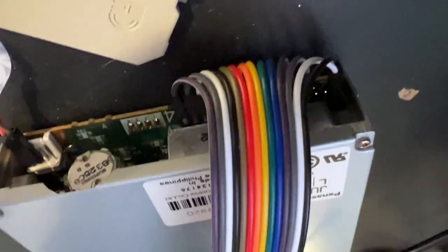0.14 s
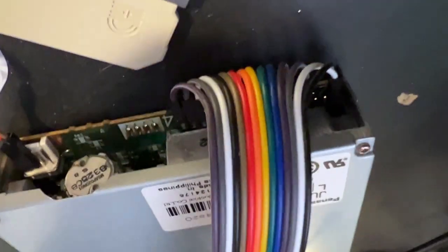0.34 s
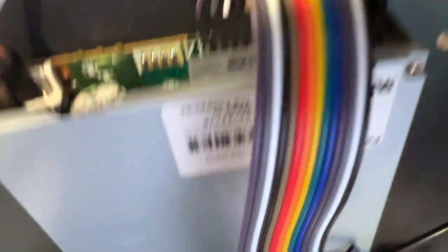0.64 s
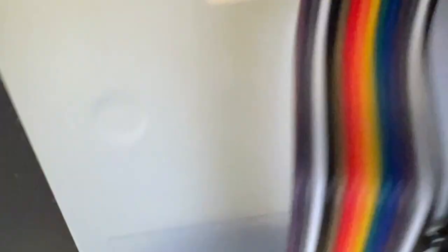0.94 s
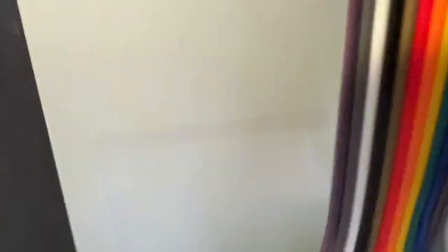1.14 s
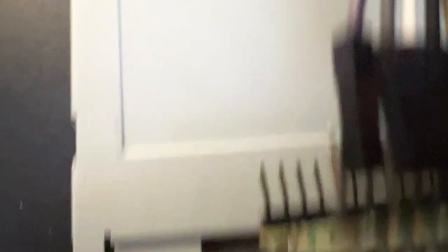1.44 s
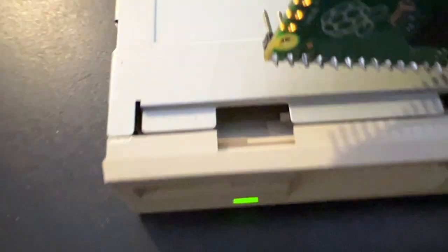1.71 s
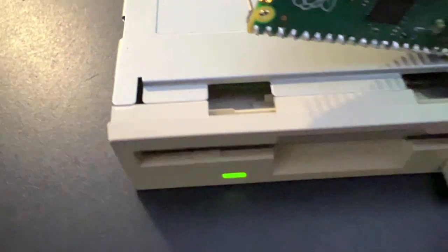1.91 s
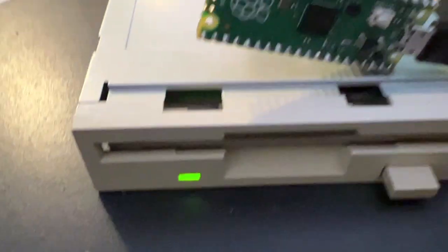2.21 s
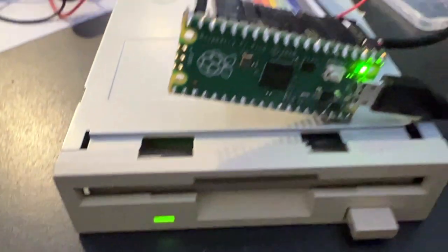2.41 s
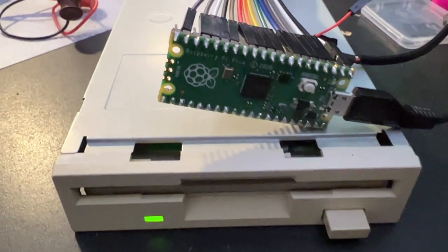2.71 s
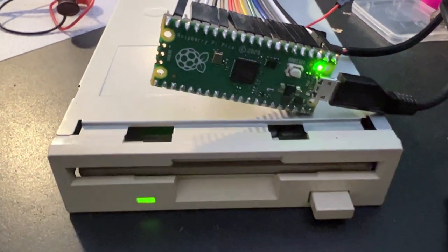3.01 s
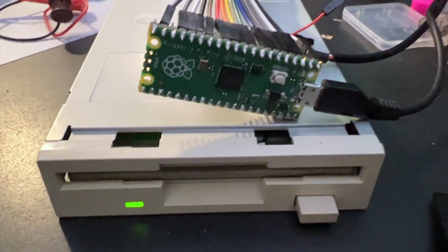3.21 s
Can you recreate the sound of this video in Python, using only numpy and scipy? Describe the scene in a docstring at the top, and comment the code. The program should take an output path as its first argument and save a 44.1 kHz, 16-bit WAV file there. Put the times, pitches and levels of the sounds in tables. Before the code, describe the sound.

Floppy disk drive spins with faint whine and rhythmic squeaks, two sharp head knocks, dry handling ticks

```python
"""Room rumble and hiss come first, with a motor whine and a squeak once per disk turn: a floppy disk drive on a desk.
A hand-held two-port microphone swings from its back to its front; the head knocks twice; dry ticks run at the left port.
Squeaks are gliding sines; knocks ring body modes; whine, hum and narrow hiss are resonated noise.
Ticks and scrape are band-passed noise bursts and grains; hand bumps are struck resonances; the room is shaped noise."""
import sys
import numpy as np
from scipy import signal
from scipy.fft import rfft, irfft
from scipy.io import wavfile

SR = 44100
rng = np.random.default_rng(int(sys.argv[2]) if len(sys.argv) > 2 else 0)


def bounce(signal):
    """Save signal as a 16-bit WAV file at the path given by the first command-line argument."""
    frames = np.transpose(np.atleast_2d(signal))
    limited = np.clip(frames, -1, 1)
    pcm = np.round(limited * 32767).astype(np.int16)
    wavfile.write(sys.argv[1], SR, pcm)


N = 147735


def amp(db):
    """Amplitude factor of a level in dB."""
    return 10 ** (np.asarray(db) / 20)


def unit(x):
    """Scale to rms 1."""
    return x / np.sqrt(np.mean(x ** 2) + 1e-20)


def times():
    """Sample times [s]."""
    return np.arange(N) / SR


def curve(rows):
    """Interpolate (time, level) rows over the scene."""
    return np.interp(times(), *np.transpose(rows))


def at_hz(points, hz, column=1):
    """Interpolate a table column over log frequency."""
    p = np.array(points)
    log_hz = np.log(np.maximum(hz, 1))
    return np.interp(log_hz, np.log(np.maximum(p[:, 0], 1)), p[:, column])


def drift(rate_hz):
    """Slow random signal of rms 1: two-pole low-passed noise, computed at SR / 40."""
    step = 40
    r = np.exp(-2 * np.pi * rate_hz * step / SR)
    settle = 2000
    noise = rng.standard_normal(N // step + settle + 2)
    slow = signal.lfilter([1], [1, -2 * r, r * r], noise)[settle:]
    return np.interp(np.arange(N) / step, np.arange(len(slow)), unit(slow))


def ring(x, hz, t60_s):
    """Two-pole resonator: a unit click starts a decaying sine of height 1."""
    r = amp(-60 / (max(t60_s, .001) * SR))
    w = 2 * np.pi * hz / SR
    return signal.lfilter([0, np.sin(w)], [1, -2 * r * np.cos(w), r * r], x + 1e-18)


def band(x, edges_hz):
    """Butterworth band-pass."""
    edges_hz = np.clip(edges_hz, 10, 19000)
    return signal.sosfilt(signal.butter(2, edges_hz, "band", fs=SR, output="sos"), x)


def coloured(spectrum, shape, column=1):
    """Noise with the spectral shape of a table column, rms 1."""
    gain = amp(at_hz(spectrum, np.fft.rfftfreq(N, 1 / SR), column=column))
    return unit(irfft(rfft(rng.standard_normal(shape)) * gain, N))


def narrow(hz, wide_hz):
    """Noise through a narrow resonance: a wavering tone, rms 1."""
    return unit(ring(rng.standard_normal(N), hz, np.log(1000) / (np.pi * wide_hz)))


def fade(peak_s, rise_s, t60_s):
    """Swell of 20 dB per rise_s up to peak_s, then exponential decay."""
    t = times() - peak_s
    decay = np.where(t < 0, -t / rise_s / 3, t / t60_s)
    return amp(-60 * np.clip(decay, 0, 5))


# one squeak of the disk in its sleeve: (time after start [s], centre pitch [Hz], relative level [dB])
SQUEAK_GLIDE = [(0, 9250, -14), (.006, 9200, -5), (.022, 9000, -2.5), (.027, 8800, -3), (.034, 8600, -1.5),
                (.041, 8650, -0.5), (.048, 9000, -3.5), (.056, 9700, -9), (.064, 10300, -24)]
# squeak from turn to turn: (time [s], level [dB], extra lead-in level [dB])
SQUEAK_TURNS = [(0.1101, -52, -12), (0.3097, -56.5, -9), (0.5043, -60, -4), (0.7064, -51, -8),
                (0.9097, -53.5, 0), (1.1094, -73, 0), (1.3014, -42.5, -16), (1.502, -43, -2),
                (1.71, -42.5, -1), (1.9011, -44.5, -1), (2.1066, -45.5, 0), (2.3094, -51.5, 0),
                (2.5094, -57.5, 3), (2.7076, -53.5, -2), (2.91, -54.5, 5), (3.1094, -53.5, -1),
                (3.3129, -53.5, -3)]
FIRST_SQUEAK_S, TURN_S, SQUEAK_LEAD_IN_S = 0.0742, .2, .024
SQUEAK_FLUTTER_DB, SQUEAK_WOBBLE_HZ = 2.5, 92.7   # rms
SQUEAK_BLUR_HZ, SQUEAK_BLUR = 250, .7   # top of the roughness band, rms depth


def squeaks():
    """One gliding sine per disk turn, roughened by noise modulation."""
    glide_s, glide_hz, glide_db = np.transpose(SQUEAK_GLIDE)
    turn_s, turn_db, lead_in_db = np.transpose(SQUEAK_TURNS)
    since_s = (times() - FIRST_SQUEAK_S) % TURN_S
    lead_in = np.clip((SQUEAK_LEAD_IN_S - since_s) / .004, 0, 1)
    level_db = np.interp(since_s, glide_s, glide_db) + np.interp(times(), turn_s, turn_db)
    level_db += lead_in * np.interp(times(), turn_s, lead_in_db)
    level_db += SQUEAK_FLUTTER_DB * drift(84)
    pitch_hz = np.interp(since_s, glide_s, glide_hz) + SQUEAK_WOBBLE_HZ * drift(90)
    whistle = np.sin(2 * np.pi * np.cumsum(pitch_hz) / SR)
    grain = 1 + SQUEAK_BLUR * unit(band(rng.standard_normal(N), (20, SQUEAK_BLUR_HZ)))
    return amp(level_db) * grain * (since_s < glide_s[-1]) * whistle


# head knocks: (time [s], body level [dB])
HEAD_KNOCKS = [(.859, -20.5), (2.656, -19.5)]
# contacts, one list per knock: (time [s], strength into high modes [dB], into low modes [dB])
KNOCK_CONTACTS = [
    [(.8545, -14, -26), (.8593, 2, -10), (.862, -2.5, -14), (.8655, -1.5, 0), (.872, -8, -17),
     (.8775, -15.5, -15), (.885, -22, -18)],
    [(2.6548, 1.5, -4), (2.657, 1, -1.5), (2.661, -5.5, -12), (2.667, -9, -12), (2.672, -17, -18),
     (2.685, -23, -20)],
]
# drive body modes: (frequency [Hz], level from behind [dB], level from the front [dB], t60 [s])
BODY_MODES = [(253, -11, -13, 0.13), (310, -4.5, -8.5, 0.077), (390, -7, -6, .06), (456, -6, 1, 0.1),
              (517, -4, 0, 0.13), (580, -12, -9, 0.14), (759.5, -5.5, -14, 0.1), (1005, 0.5, -4.5, 0.074),
              (1130, -1, -9, 0.13), (1320, -12, -13, 0.068), (1728, -7, -5.5, 0.056),
              (1940, -2.5, -8, 0.057), (2130, -4, -14, 0.055), (2907, -5, -15, 0.04),
              (3990, -4, -24, 0.024), (7840, -13, -22, 0.0297)]
# crack noise, relative: (frequency [Hz], level from behind [dB per Hz], level from the front [dB per Hz])
CRACK_SPECTRUM = [(170, -34, -36), (330, -4, -3), (550, -8, -5), (950, 2, -2.5), (2450, -6, -10.5),
                  (4140, -11, -15.5), (5660, -15.5, -24), (6300, -20, -19), (7600, -9.5, -15),
                  (11100, -20.5, -8), (12600, -26, -23), (14500, -20, -27), (16200, -40, -34)]
LOW_MODES_HZ, KNOCK_PAN_DB = 700, 2
CHATTER_PER_S, CHATTER_DB, CHATTER_T60_S, CHATTER_RISE_S = 1500, -12, .012, 0.0021
CRACK_DB, CRACK_T60_S = -20, 0.02
ROOM_DB, ROOM_T60_S, ROOM_DULL_HZ = -11.5, 0.2, 5000   # ROOM_DB is relative to the crack


def knock_body(contacts, column):
    """Contacts and the chatter around them ring the drive's modes."""
    grit = amp(CHATTER_DB) * (rng.random(N) < CHATTER_PER_S / SR) * rng.standard_normal(N)
    drive = np.zeros((2, N))   # into high modes, into low modes
    for at_s, high_db, low_db in contacts:
        touch = grit * fade(at_s, CHATTER_RISE_S, CHATTER_T60_S)
        touch[int(at_s * SR)] = 1
        drive += amp([[high_db], [low_db]]) * touch
    body = 0
    for j, mode in enumerate(BODY_MODES):
        hz, t60_s = mode[0], mode[3]
        rung = ring(drive[int(hz < LOW_MODES_HZ)], hz, t60_s)
        sign = (-1) ** ((j + 1) // 2)
        body = body + sign * amp(mode[column]) * rung / abs(rung).max()
    return body


def knock_crack(contacts, column):
    """Shaped noise swelling and decaying at each contact, summed in power."""
    power = 0
    for at_s, high_db, _ in contacts:
        power = power + amp(2 * high_db) * fade(at_s, CHATTER_RISE_S, CRACK_T60_S) ** 2
    return amp(CRACK_DB) * power ** .5 * coloured(CRACK_SPECTRUM, N, column=column)


def knock_room(knock_s, column):
    """Decaying noise tail of one knock, two independent channels."""
    swell = fade(knock_s + 0.0057, 0.022, ROOM_T60_S)
    return amp(CRACK_DB + ROOM_DB) * swell * coloured(CRACK_SPECTRUM, (2, N), column=column)


def knocks():
    """Two head knocks, first heard from behind, then from the front: body, crack, dull room tail."""
    near, tail = 0, 0
    for column, ((knock_s, body_db), contacts) in enumerate(zip(HEAD_KNOCKS, KNOCK_CONTACTS), start=1):
        near = near + amp(body_db) * knock_body(contacts, column)
        near = near + knock_crack(contacts, column)
        tail = tail + knock_room(knock_s, column)
    tail = signal.sosfilt(signal.butter(1, ROOM_DULL_HZ, fs=SR, output="sos"), tail)
    tail = amp(2.6 * drift(60)) * tail
    pan = amp([[KNOCK_PAN_DB / 2], [-KNOCK_PAN_DB / 2]])
    return ports(near + tail[0]) * pan + tail[1] * np.array([[.6], [-.6]])


# motor whine: (time [s], level [dB])
WHINE_LEVEL = [(0, -54), (.5, -51.5), (1, -49.5), (1.5, -46), (1.75, -59), (2.3, -52.5), (2.8, -54),
               (3.35, -55.5)]
# low hiss band, heard from behind the drive: (time [s], level [dB])
HISS_LOW_LEVEL = [(0, -61.5), (.4, -62.5), (.8, -74), (1.1, -70), (1.4, -79), (3.35, -95)]
# high hiss band: (time [s], level [dB])
HISS_HIGH_LEVEL = [(0, -66), (.6, -66), (1.2, -64), (1.6, -67), (2.0, -62), (2.5, -62), (2.9, -62),
                   (3.35, -65)]
WHINE_HZ, WHINE_WIDE_HZ, WHINE_FLUTTER_DB = 980, 24, 1.2
HUM_HZ, HUM_WIDE_HZ, HUM_DB = 117.9, 12, -43.5
HISS_LOW_HZ, HISS_LOW_WIDE_HZ = 4300, 700
HISS_HIGH_HZ, HISS_HIGH_WIDE_HZ = 13700, 350


def tones():
    """Motor whine, mains hum and two hiss bands: noise through narrow resonances."""
    whine_db = curve(WHINE_LEVEL) + WHINE_FLUTTER_DB * drift(19)
    whine = amp(whine_db) * narrow(WHINE_HZ, WHINE_WIDE_HZ)
    hum = amp(HUM_DB) * narrow(HUM_HZ, HUM_WIDE_HZ)
    hiss_low = amp(curve(HISS_LOW_LEVEL)) * narrow(HISS_LOW_HZ, HISS_LOW_WIDE_HZ)
    hiss_high = amp(curve(HISS_HIGH_LEVEL)) * narrow(HISS_HIGH_HZ, HISS_HIGH_WIDE_HZ)
    return whine + hum + hiss_low + hiss_high


# phase lead of the left port, negative = lag: (frequency [Hz], lead [rad])
PORT_LEAD = [(100, -.2), (1000, -1.1), (3000, -1.4), (6000, -.8), (8500, -1.3), (9200, -2.4), (9600, -3.14),
             (10900, -3.14), (11700, -5.6), (12300, -6.28), (16000, -6.6)]


def ports(x):
    """Split the phase difference between the ports evenly: half lead left, half lag right."""
    half = np.exp(.5j * at_hz(PORT_LEAD, np.fft.rfftfreq(N, 1 / SR)))
    return irfft(rfft(x) * np.array([half, half.conj()]), N)


# ticks: (time [s], ring peak [dB], left-right [dB], body re ring [dB], low body re ring [dB],
#         air re ring [dB], snap time scale [s])
TICK_EVENTS = [(1.0435, -54, 5, -3, -3, -18, 0.0018), (1.088, -47, 15, -3, -3, -18, 0.0018),
               (1.16, -43, 19, 1, -3, -20, 0.0018), (1.194, -39, 22, -4, -6, -27, 0.0019),
               (1.265, -50, 13, -7, -5, -16, 0.0018), (1.285, -42, 21, -6, -3, -17, 0.0018),
               (1.317, -36, 22, 0, -8, -25, 0.002), (1.3515, -34.5, 25, 0, -2, -26, 0.002),
               (1.374, -36, 21, -3, 2, -23, 0.0019), (1.4, -32, 27, 0.5, -5, -30, 0.002),
               (1.4371, -27, 27, -2, -1, -22, 0.0022), (1.457, -36, 14, -10, -7, -8, 0.0018),
               (1.465, -40, 20, -2, 0, -20, .0015), (1.4762, -21, 26, -6, -3, -14, 0.0026),
               (1.503, -24, 32, 2.5, -2.5, -22, 0.0024), (1.5253, -23.5, 30, 2, 1, -15, 0.0018),
               (1.557, -36, 14, -4, -3, -9, 0.002), (1.5623, -27.5, 25, 4.5, 0, -5.5, 0.0027),
               (1.5744, -43, 5.0, -2, -3, 0, 0.0018), (1.633, -27.5, 32, 2.5, 0, -21, 0.0027),
               (1.638, -32, 30, -1, 0, -21, 0.0015), (1.6602, -26, 30, 7, 3.5, -17, 0.0022),
               (1.672, -40, 25, 0, -5, -17, 0.0017), (1.695, -19, 27, -0.5, 0, -22, 0.0025),
               (1.7676, -18, 33, -1, -2.5, -24, 0.002), (1.8177, -17, 32, -1, -5, -32, 0.0016),
               (1.8705, -17, 32, -1, -5.5, -32, 0.0018), (1.928, -15.5, 32, -6.5, -7.5, -32, 0.0016),
               (2.0216, -17, 32, -1, -2, -13, 0.0015), (2.1064, -13, 36, -8.5, -7.5, -32, 0.0011),
               (2.203, -24, 31, 6, 1, -28, 0.0014), (2.3418, -26.5, 31, 5, 2.5, -28, 0.002)]
# tick resonances: (frequency [Hz], relative level [dB], t60 [s])
TICK_MODES = [(6160, 1, 0.0025), (8560, -12, 0.002)]
TICK_BODY_HZ, TICK_LOW_HZ, TICK_AIR_HZ = (2740, 5180), (1220, 2500), (8000, 15500)
TICK_TAIL_DB, TICK_TAIL_S = -24, .002
TICK_SAMPLES = 900


def ticks():
    """Noise snaps a few ms long: short ring, broad body, and air that reaches both ports."""
    out = np.zeros((2, N))
    for at_s, peak_db, pan_db, body_db, low_db, air_db, scale_s in TICK_EVENTS:
        at = int(at_s * SR)
        t = np.arange(TICK_SAMPLES) / SR / scale_s
        tail = amp(TICK_TAIL_DB) * np.tanh(t) * np.exp(-t * scale_s / TICK_TAIL_S)
        snap = (t * t * np.exp(-t * t) + tail) * rng.standard_normal(TICK_SAMPLES)
        rung = 0
        for k, (hz, gain_db, t60_s) in enumerate(TICK_MODES):
            rung = rung + (-1) ** k * amp(gain_db) * ring(snap, hz, t60_s)
        parts = [(band(rung, (3500, 12000)), 0, 1),   # signal, level re ring [dB], share of the pan
                 (band(snap, TICK_BODY_HZ), body_db, .8),
                 (band(snap, TICK_LOW_HZ), low_db, .6),
                 (band(snap, TICK_AIR_HZ), air_db, .1)]
        for part, extra_db, share in parts:
            left_db = peak_db + extra_db
            gains = amp([[left_db], [left_db - share * pan_db]])
            out[:, at:at + TICK_SAMPLES] += part / abs(part).max() * gains
    return out


# scraping at the left port: (time [s], level [dB])
SCRAPE_LEVEL = [(1.0, -75), (1.2, -71), (1.44, -62), (1.54, -50), (1.565, -45), (1.6, -60), (1.64, -52),
                (1.75, -54), (2.0, -56.5), (2.25, -55), (2.4, -75)]
SCRAPE_PER_S, SCRAPE_HZ, SCRAPE_PAN_DB = 1800, (1500, 8600), 22


def scrape():
    """Friction as sparse random grains of uneven strength, band-passed."""
    grains = (rng.random(N) < SCRAPE_PER_S / SR) * rng.standard_normal(N) * amp(4 * drift(25))
    return amp(curve(SCRAPE_LEVEL)) * unit(band(grains, SCRAPE_HZ)) * amp([[0], [-SCRAPE_PAN_DB]])


# handling rumble: (time [s], level [dB])
RUMBLE_LEVEL = [(0, -39), (.4, -39), (.8, -65), (1.3, -49), (1.9, -37), (2.4, -39.5), (2.6, -46),
                (3.35, -52)]


def rumble():
    """Deep band-passed noise from the hand, equal at both ports."""
    return amp(curve(RUMBLE_LEVEL)) * unit(band(rng.standard_normal(N), (22, 45)))


# hand bumps on the housing: (time [s], nominal level [dB], thump re level [dB])
HAND_BUMPS = [(1.089, -24.5, -6), (1.196, -26.5, -4), (1.4, -27, -8), (1.427, -34, -4), (1.49, -34, 10),
              (1.595, -34, 8), (1.635, -26, -8), (1.706, -30, 8), (1.757, -23.5, -2), (1.785, -25, 3),
              (1.835, -33, 11), (1.877, -22, 1), (1.91, -23, 1), (1.965, -34, 8), (2.005, -29, 4),
              (2.034, -24, 1), (2.116, -29, 9), (2.165, -30, 2), (2.212, -28, 6), (2.302, -27, -6),
              (2.549, -25.5, -2)]
# bump resonances: (frequency [Hz], relative level [dB], t60 [s])
BUMP_MODES = [(185, -2, .03), (307, -1.5, 0.012), (528, 2, 0.0087), (920, -7, 0.014), (1270, -16, 0.0075)]
THUMP_HZ, THUMP_T60_S = 92, 0.07
BUMP_LAG_CYCLES, BUMP_SPREAD_DB = .7, 2.14   # lag in cycles: lower modes start later


def bumps():
    """Clicks of randomly varied strength ring the housing modes; dulled, weaker at the right port."""
    at_s, level_db, thump_db = np.transpose(HAND_BUMPS)
    out = 0
    for hz, gain_db, t60_s in [(THUMP_HZ, thump_db, THUMP_T60_S)] + BUMP_MODES:
        clicks = np.zeros(N)
        start = ((at_s + BUMP_LAG_CYCLES / hz) * SR).astype(int)
        clicks[start] = amp(level_db + gain_db + rng.normal(0, BUMP_SPREAD_DB, len(at_s)))
        out = out + ring(clicks, hz, t60_s)
    dull = signal.sosfilt(signal.butter(3, 1100, fs=SR, output="sos"), out)
    return dull * np.array([[1], [.6]])


# room and drive noise in phase at the ports: (frequency [Hz], relative level [dB per Hz])
ALIKE_SPECTRUM = [(26, -46), (45, -4), (64, 2), (92, -5), (124, -2.5), (158, -11), (213, -10.5), (435, -22),
                  (469, -17.5), (571, -24), (806, -28), (958, -27), (1420, -30.5), (2220, -34),
                  (3630, -47.5), (4320, -44.5), (5800, -51.5), (8000, -51), (8820, -54), (10200, -82),
                  (11600, -47.5), (13800, -50), (16400, -63)]
# noise in opposite phase at the ports: (frequency [Hz], relative level [dB per Hz])
OPPOSED_SPECTRUM = [(12, -57), (20, -20), (60, -1.5), (211, -11), (304, -11.5), (360, -14), (438, -13.5),
                    (706, -11), (790, -17.5), (1640, -15.5), (2710, -29.5), (4370, -35), (6120, -39),
                    (8110, -41), (8820, -37.5), (12000, -35.5), (13400, -56), (15000, -40), (16400, -53)]
# gain as the microphone moves: (time [s], bass [dB], middle [dB], presence [dB], treble [dB])
SWING_GAIN = [(0, -1, 1, -0.5, -0.5), (.3, 2, 1, -4, -2.5), (0.602, 0.5, 1, 1.5, -5.5),
              (0.899, 3, 1, -0.5, -5), (1.2, 4, 2, 0.5, -2), (1.45, 3.5, 3.5, 3, 5), (1.6, 3, 2.5, 3, 8),
              (1.8, 3, 3, 2, 4), (2.0, 2, 2, 2, 4.5), (2.25, 3, 1, 1, 4), (2.501, -8, 3, -4, 1.5),
              (2.8, -1.5, 2, -3.5, 0), (3.1, 0.5, 0.5, -2.5, -1), (3.35, 0, 2.5, -4, 1)]
# centres of those four bands: (frequency [Hz])
SWING_BANDS = [70, 500, 4500, 13000]
ALIKE_DB, OPPOSED_DB = -31.5, -43.5   # before the swing gains
PATCHY_DB = 1.27   # rms flicker of each band


def background():
    """In-phase and opposed noise in overlapping bands, each following the swing and flickering."""
    alike = amp(ALIKE_DB) * coloured(ALIKE_SPECTRUM, N)
    opposed = amp(OPPOSED_DB) * coloured(OPPOSED_SPECTRUM, N)
    spectra = rfft(np.array([alike, opposed]))
    swing_s, *band_gains = np.transpose(SWING_GAIN)
    log_hz = np.log(np.fft.rfftfreq(N, 1 / SR) + 1)
    place = np.interp(log_hz, np.log(SWING_BANDS), np.arange(4))
    out = 0
    for k, gain_db in enumerate(band_gains):
        weight = np.clip(1 - abs(place - k), 0, 1)   # triangular crossfade
        level_db = np.interp(times(), swing_s, gain_db) + PATCHY_DB * drift(8.2)
        out = out + amp(level_db) * irfft(spectra * weight, N)
    return out[0] + out[1] * np.array([[1], [-1]])


def scene():
    """Sum of all layers, left and right port."""
    drive = ports(squeaks() + tones()) + knocks()
    return drive + ticks() + scrape() + rumble() + bumps() + background()


CUTOFF_HZ = 16600


def record(dry):
    """Steep low-pass: the top is cut."""
    return signal.sosfilt(signal.cheby2(18, 60, CUTOFF_HZ, fs=SR, output="sos"), dry)


dry = scene()
out = record(dry)
bounce(out)
```